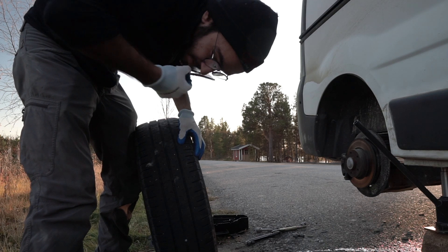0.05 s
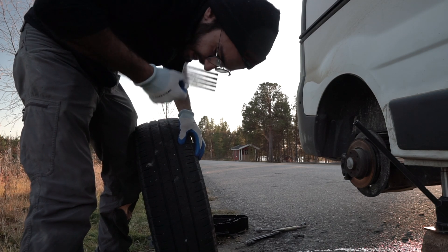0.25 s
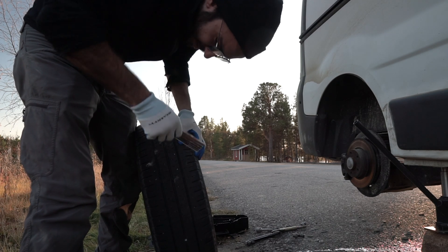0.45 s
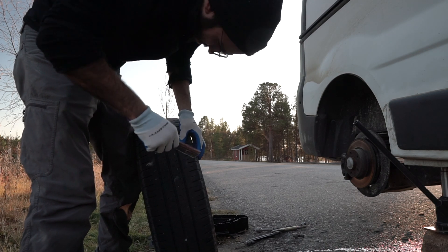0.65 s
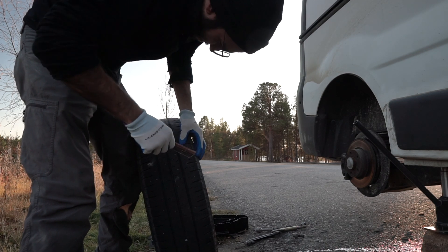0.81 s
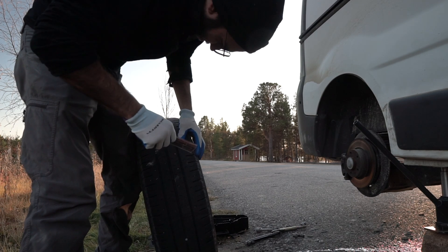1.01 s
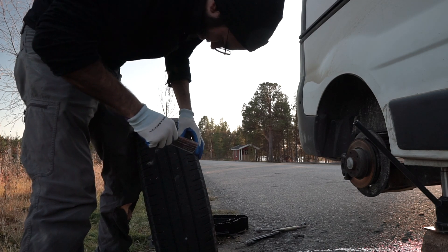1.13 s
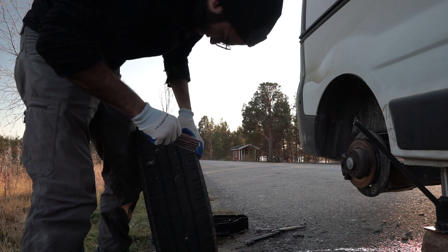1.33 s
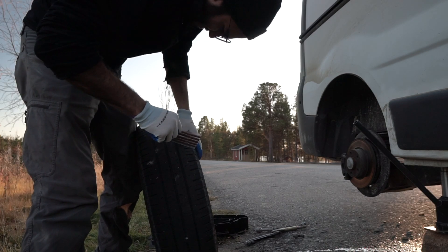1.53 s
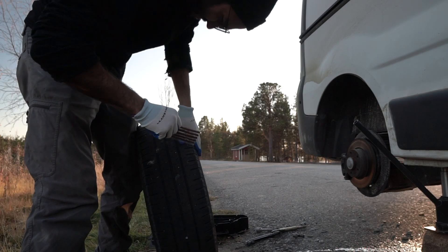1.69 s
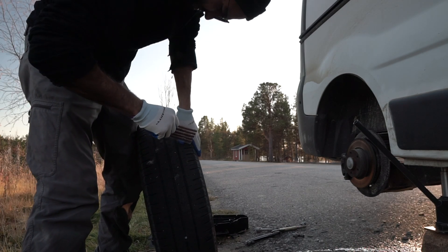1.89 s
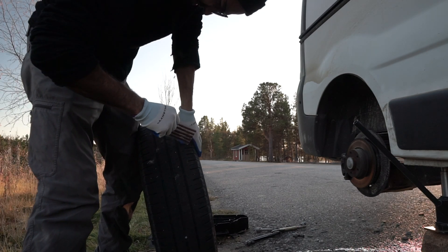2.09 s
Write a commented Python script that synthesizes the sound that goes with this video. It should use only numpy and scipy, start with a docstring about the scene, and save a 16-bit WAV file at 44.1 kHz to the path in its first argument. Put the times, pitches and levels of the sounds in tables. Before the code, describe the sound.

Air escapes from a tyre hole, close and bright, outdoors. It starts as a weak, spitting hiss; a hard metallic tool click lands at 0.22 s. The hiss swells by 0.7 s, a sharp tap and brief dip come around 1.04 s, then it surges roughly, loudest at 1.2-1.6 s. It fades and is choked off near 1.95 s, creeping back faintly. Gloves rub, rubber knocks and thuds softly over faint rumble.

```python
"""Air hissing from a punctured tyre

Air jets from a hole in a tyre held upright at a roadside. The hiss is noise split into bands that swell,
spit and flicker; as gloved hands work it is shut down to almost nothing, then creeps back a little.
A tool clicks, hands knock the rubber and the carcass booms softly: short kicks ringing fading tones.
Gloves rub as grainy noise, and a quiet outdoor rumble of shaped noise lies underneath."""
import sys
import numpy as np
from scipy import signal
from scipy.fft import rfft, irfft
from scipy.io import wavfile
from scipy.ndimage import uniform_filter1d

SR = 44100
rng = np.random.default_rng(int(sys.argv[2]) if len(sys.argv) > 2 else 0)


def file_out(sig):
    """Save sig as 16-bit WAV at sys.argv[1]."""
    # one column per channel
    cols = np.atleast_2d(sig).T
    # limit, then scale
    lim = np.clip(cols, -1, 1)
    pcm = np.round(lim * 32767).astype(np.int16)
    wavfile.write(sys.argv[1], SR, pcm)


N = 94815  # length in samples

# Air flow through the hole: (time [s], overall level [dB], lower, upper and top hiss against core [dB]);
# each of the last three is used as a change from its own middle value
AIR_FLOW = [(0, -43, -3.5, -0.24, -14), (.07, -45.5, -5.5, 0.87, -19), (.09, -40.5, 0, -0.8, -8),
            (.2, -34.5, -7.5, 0.62, -15), (0.27, -38.5, 1.5, 5, -7), (0.278, -34, -5, -1, -7.5),
            (0.48, -31, -4, 1, -4.5), (0.496, -28.5, -5, -2.5, -7), (0.728, -23, -3.5, -9, -9.5),
            (0.96, -24, -5, -1.5, -9), (0.98, -26, -0.5, 6, -6), (1.0, -22.5, -9, -11, -11),
            (1.028, -33, 0.5, 1, -6), (1.04, -27.5, -3, 5.5, -13), (1.06, -34, -5.5, 0, -3),
            (1.12, -27, -3.5, -0.5, 2), (1.14, -23.5, -7, -2, -4.5), (1.218, -17.5, -11, -8, -5.5),
            (1.242, -16, -7.5, -0.5, -11), (1.346, -24.5, -2, 0.5, -13), (1.36, -21.5, -6.5, -10, -15),
            (1.44, -23, -5, -5, -10), (1.488, -22, -6.5, -7, -12), (1.496, -24.5, -5.5, -9, -8),
            (1.552, -13, -2, -11.5, -18.5), (1.578, -21, -4, -4, -11), (1.596, -15.5, -9.5, -4, -11),
            (1.614, -24.5, -4.5, -1, -12), (1.67, -22, -3.5, -8, -9), (1.72, -27.5, -8, -5, -8),
            (1.75, -27, -5, -0.5, -9), (1.83, -28.5, -6, 3, -6), (1.89, -29.5, -7, 6, -13),
            (1.92, -35.5, -7, 6, -19), (1.96, -48, -10, -8, -10), (2.02, -67.5, 10.5, -13, 5),
            (2.07, -63.5, 6, -9, -2), (2.15, -51, -8, -7, -9)]
# Centres of the lower, core, upper and top hiss: (frequency [Hz])
HISS_CENTRES = (3730, 7150, 10500, 13900)
# Colour of the jet noise: (frequency [Hz], relative level [dB])
JET_COLOUR = [(210, -57), (350, -33), (678, -22.5), (1780, -14), (2350, -11), (3570, -8), (4470, -5),
              (5980, -3.5), (6690, -1.5), (11400, -5.5), (15000, -14.5), (15700, -12), (16500, -43)]
# Colour of the left-right difference in the jet: (frequency [Hz], gain [dB])
JET_SIDE_COLOUR = [(300, -18), (700, -42), (1290, -78), (2380, -30.5), (4400, -8.5), (8120, -7.5),
                   (15000, -0.5)]
# Treble reaching the left side first: (frequency [Hz], level against the middle [dB])
LEFT_LEAD = [(8000, -32), (10500, -31), (13000, 1), (16000, -23)]
# Reflections from the ground and the side of a van: (delay [s], gain [dB])
REFLECTIONS = [(.00305, -15), (.0056, -17.5)]
# Whistly bands as hands move round the hole:
# (one end [s], other end [s], frequency [Hz], gain before wavering [dB]); the ends come in either order
WHISTLE_BANDS = [(0.061, 1.26, 2560, -7.5), (0.22, 0.85, 5240, -1.5), (0.55, 1.16, 4500, -4),
                 (0.51, 1.24, 6800, -4.5), (0.45, 0.71, 7850, -4), (0.33, 0.55, 9660, -4),
                 (0.51, 0.76, 11900, 7), (0.51, 0.94, 11100, 0.5), (1.2, 1.46, 13500, -4),
                 (1.8, 1.46, 6500, -13), (1.295, 1.78, 3700, -5.5), (1.52, 0.67, 10000, -2),
                 (1.89, 2.28, 8000, 7)]
# Low tones of the tyre carcass: (frequency [Hz], relative level [dB], time to fade by 60 dB [s])
CARCASS_MODES = [(138.3, -8.5, 0.3), (179.7, 2.5, 0.091), (243.7, -0.5, 0.21)]
# Low bumps of the carcass: (time [s], strength [dB])
BUMP_TIMES = [(0.773, -42.5), (1.269, -40), (1.488, -27), (1.505, -30), (1.525, -40), (1.802, -32.5),
              (2.049, -37.5), (2.083, -35)]
# Gloves rubbing the tread: (time [s], level [dB])
RUB_LEVEL = [(0, -64.5), (.3, -44), (.35, -52.5), (.6, -49), (.85, -43), (1.1, -42), (1.2, -35),
             (1.35, -45.5), (1.66, -43.5), (1.73, -34), (1.83, -35), (1.87, -39.5), (1.93, -56.5),
             (2.07, -59.5), (2.15, -60)]
# Colour of the rubbing: (frequency [Hz], relative level [dB])
RUB_SPECTRUM = [(200, -11), (330, -12), (480, -10.5), (650, -2), (850, -4.5), (1100, -8.5), (1350, 0),
                (1700, -10), (2400, -5.5), (4000, -39)]
# Colour of the outdoor background: (frequency [Hz], relative level [dB])
AIR_COLOUR = [(25, -27.5), (127, -6), (195, 0.5), (300, -10.5), (476, -10.5), (607, -9), (775, -2),
              (1290, -5), (1550, -11.5), (2500, -30), (7500, -22), (10000, -18), (12500, -45), (16000, -28)]
# Sharp spits from the hole while the flow is weak: (time [s], strength [dB])
SPIT_TIMES = [(.009, -32), (0.0368, -22), (0.0604, -25.5), (.1225, -30), (.134, -25), (1.945, -28)]
# Knocks on the rubber: (time [s], strength [dB], pitch [Hz], time to fade by 60 dB [s],
# second tone against first [dB])
KNOCK_TAPS = [(0.2232, -22.5, 406, 0.025, -15), (.289, -34, 925, 0.0087, 2), (0.428, -27, 970, 0.013, -23),
              (1.0407, -14.5, 903, 0.01, -3.5), (1.062, -32, 950, 0.0074, -10),
              (1.0655, -31.5, 820, 0.028, 1), (1.147, -34.5, 777, 0.09, -12), (1.165, -33, 784, 0.05, -12),
              (1.192, -28, 800, 0.028, 0), (1.235, -28, 822, 0.055, -1), (1.283, -32.5, 610, 0.038, -1),
              (1.726, -31.5, 1090, 0.04, 4), (1.769, -34, 750, 0.013, -16), (1.814, -31, 663, 0.067, -13),
              (2.073, -40, 760, 0.05, -23)]
# Contacts of the tool: (time [s], strength [dB])
TOOL_CLICKS = [(.2238, -31), (.2246, -8.5), (.2283, -14), (.2325, -10.5), (.2345, -14), (.2405, -22)]
# Tones of the tool: (frequency [Hz], relative level [dB], time to fade by 60 dB [s])
TOOL_MODES = [(1140, -13.5, 0.013), (1650, -16.5, 0.01), (2326, -11.5, 0.016), (2850, -11.5, 0.014),
              (3660, -11, 0.025), (4430, -17, 0.013), (5100, -9, 0.0075), (5900, -19, 0.02)]

SPIT_DB, SPIT_PER_S = 1, 900  # fast roughness of the jet: spread [dB], new levels per second
FLICKER_DB, FLICKER_PER_S = 0.23, 15.3  # slower flicker of each band
WHISTLE_WIDTH_HZ, WHISTLE_WAVER_DB, WHISTLE_WAVER_PER_S = 152, 4.5, 11.65
PUSH_S, BUMP_LOW_HZ, MURMUR_DB = 0.0045, 137, -57.5  # murmur level is before its low cut
RUB_GRAIN_DB, RUB_GRAIN_PER_S = 2.5, 150
AIR_DB, AIR_SIDE_DB = -51, -18.5  # the second is against the first
SPIT_FADE_S, SPIT_LOW_HZ, SPIT_TOP_HZ = 0.00054, 3340, 10800
KNOCK_SECOND_RATIO, KNOCK_THIRD_RATIO, KNOCK_LOW_HZ = 1.8, 2.9, 323
CRACK_FADE_S, KNOCK_CRACK_DB, TOOL_CRACK_DB = 0.0026, -8, -12
TOP_HZ = 15800

LEFT_RIGHT = np.array([[1], [-1]])  # adds to the left, takes from the right


def undb(db):
    """Turn decibels into a plain multiplier."""
    return 10 ** (np.asarray(db) / 20)


def level(x, db):
    """Set the average (RMS) level of a sound."""
    return x * undb(db) / np.sqrt(np.mean(x ** 2))


def curve(table, col):
    """Join the points of one table column with straight lines in time."""
    points = np.array(table)
    return np.interp(np.arange(N) / SR, points[:, 0], points[:, col])


def at(table, hz):
    """Read a spectrum table on a log-frequency axis, 40 dB weaker below its first point."""
    points = np.array(table)
    return np.interp(np.log(hz + 1), np.log(points[:, 0] + 1), points[:, 1], left=points[0, 1] - 40)


def colour(x, table):
    """Make each frequency stronger or weaker as the table says."""
    hz = np.arange(N // 2 + 1) * SR / N
    return irfft(rfft(x) * undb(at(table, hz)), N)


def walk(rate):
    """Random levels, `rate` new ones a second, smoothed twice; spread 1."""
    hold = int(SR / rate)
    steps = np.repeat(rng.standard_normal(N // hold + 1), hold)
    smooth = uniform_filter1d(uniform_filter1d(steps, hold), hold)[:N]
    return smooth / smooth.std()


def highpass(x, hz):
    """Remove the sound below a frequency."""
    return signal.sosfilt(signal.butter(4, hz, "high", fs=SR, output="sos"), x)


def ring(x, modes):
    """Let x set off fading tones, like a struck object."""
    out = 0
    for hz, db, t60 in modes:
        fade = np.log(1000) / (t60 * SR)  # 60 dB down after t60
        pole = np.exp(2j * np.pi * hz / SR - fade)
        out = out + undb(db) * signal.lfilter([1], [1, -pole], x).imag
    return out


def blows(table):
    """Put a one-sample kick at each time in a table."""
    x = np.zeros(N)
    for row in table:
        x[int(row[0] * SR)] += undb(row[1])
    return x


def crack(table, db):
    """A very short, dull-topped burst of noise at each contact."""
    n = np.arange(300)
    burst = rng.standard_normal(len(n)) * np.exp(-n / (CRACK_FADE_S * SR))
    bursts = np.convolve(blows(table), burst)[:N]
    return undb(db) * signal.sosfilt(signal.butter(4, 6500, fs=SR, output="sos"), bursts)


def jet():
    """Rough, turbulent noise in third-octave bands; each follows the air flow and flickers."""
    roughness = undb(SPIT_DB * walk(SPIT_PER_S))
    mid = level(colour(roughness * rng.standard_normal(N), JET_COLOUR), 2.54)
    for delay, db in REFLECTIONS:
        mid = mid + undb(db) * np.roll(mid, int(delay * SR))
    side = level(colour(roughness * rng.standard_normal(N), JET_COLOUR), 1.06)
    side = colour(side, JET_SIDE_COLOUR)
    both = rfft(mid + side * LEFT_RIGHT)
    hz = np.arange(N // 2 + 1) * SR / N
    # 1j is a quarter-cycle shift: forward on the left, back on the right
    both = both + 1j * rfft(mid) * undb(at(LEFT_LEAD, hz)) * LEFT_RIGHT
    both = whistles(both, hz)

    shifts = [curve(AIR_FLOW, 2), np.zeros(N), curve(AIR_FLOW, 3), curve(AIR_FLOW, 4)]
    shifts = np.array([s - np.median(s) for s in shifts])
    octave = np.log2(hz + 1)
    out = 0
    for centre in np.arange(8.5, 14.4, 1 / 3):  # octaves above 1 Hz
        overlap = np.clip(1 - 3 * abs(octave - centre), 0, 1)  # neighbours cross-fade
        band = irfft(both * overlap, N)
        # blend the two nearest hiss centres
        weights = np.array([np.interp(centre, np.log2(HISS_CENTRES), row) for row in np.eye(4)])
        tilt = weights @ shifts
        out = out + band * undb(tilt + FLICKER_DB * walk(FLICKER_PER_S))
    return out * undb(curve(AIR_FLOW, 1))


def carcass():
    """Soft pushes ring the tyre's low tones; handling, as steady noise, keeps them murmuring."""
    push = np.hanning(int(PUSH_S * SR))
    pushes = np.convolve(blows(BUMP_TIMES), push / push.sum())[:N]
    bumps = highpass(ring(pushes, CARCASS_MODES), BUMP_LOW_HZ)
    mid, side = (level(ring(rng.standard_normal(N), CARCASS_MODES), MURMUR_DB) for _ in range(2))
    murmur = mid + undb(-11) * side * LEFT_RIGHT
    return highpass(bumps + murmur, 126)


def rub():
    """Friction of fabric on rubber: noise whose loudness is grainy."""
    grain = undb(RUB_GRAIN_DB * walk(RUB_GRAIN_PER_S))
    friction = colour(grain * rng.standard_normal(N), RUB_SPECTRUM)
    return level(friction, 0) * undb(curve(RUB_LEVEL, 1))


def air():
    """Steady outdoor background: shaped noise, slightly different left and right."""
    mid, side = (level(colour(rng.standard_normal(N), AIR_COLOUR), AIR_DB) for _ in range(2))
    return mid + undb(AIR_SIDE_DB) * side * LEFT_RIGHT


def spits():
    """Tiny bright cracks of air: a fresh, quickly fading noise burst for each."""
    n = np.arange(200)
    x = np.zeros(N)
    for row in SPIT_TIMES:
        burst = rng.standard_normal(len(n)) * np.exp(-n / (SPIT_FADE_S * SR))
        x += np.convolve(blows([row]), burst)[:N]
    return highpass(x, SPIT_LOW_HZ) - highpass(x, SPIT_TOP_HZ)


def whistles(both, hz):
    """Narrow bands of the hiss swell in and out and waver."""
    out, t = irfft(both, N), np.arange(N) / SR
    for end_a, end_b, pitch, db in WHISTLE_BANDS:
        progress = np.clip((t - end_a) / (end_b - end_a), 0, 1)
        waver = undb(WHISTLE_WAVER_DB * walk(WHISTLE_WAVER_PER_S))
        swell = np.sin(np.pi * progress) ** .5 * waver
        window = np.exp(-.5 * ((hz - pitch) / WHISTLE_WIDTH_HZ) ** 2)
        out = out + undb(db) * swell * irfft(both * window, N)
    return rfft(out)


def knocks():
    """Dull taps: three quickly fading tones, the middle one in opposite phase, and a faint crack."""
    taps = np.zeros(N)
    for row in KNOCK_TAPS:
        _, _, pitch, t60, second_db = row
        kick = blows([row])
        taps += ring(kick, [(pitch, 0, t60), (pitch * KNOCK_THIRD_RATIO, 2 * second_db, t60 / 2)])
        taps -= ring(kick, [(pitch * KNOCK_SECOND_RATIO, second_db, t60 / 2)])
    return highpass(taps + crack(KNOCK_TAPS, KNOCK_CRACK_DB), KNOCK_LOW_HZ)


def tool():
    """Each hard contact cracks and rings the tool; neighbouring tones start in opposite phase."""
    kicks = blows(TOOL_CLICKS)
    body = ring(kicks, TOOL_MODES[::2]) - ring(kicks, TOOL_MODES[1::2])
    cracks = highpass(crack(TOOL_CLICKS, TOOL_CRACK_DB), 700)
    return highpass(body + cracks, 300)


def scene():
    """All the sounds added together."""
    return jet() + carcass() + rub() + air() + spits() + knocks() + tool()


def record(dry):
    """A steep filter, used twice, cuts the very top of the treble."""
    cut = signal.ellip(12, .2, 70, TOP_HZ, fs=SR, output="sos")
    return signal.sosfilt(cut, signal.sosfilt(cut, dry))


dry = scene()
out = record(dry)
file_out(out)
```